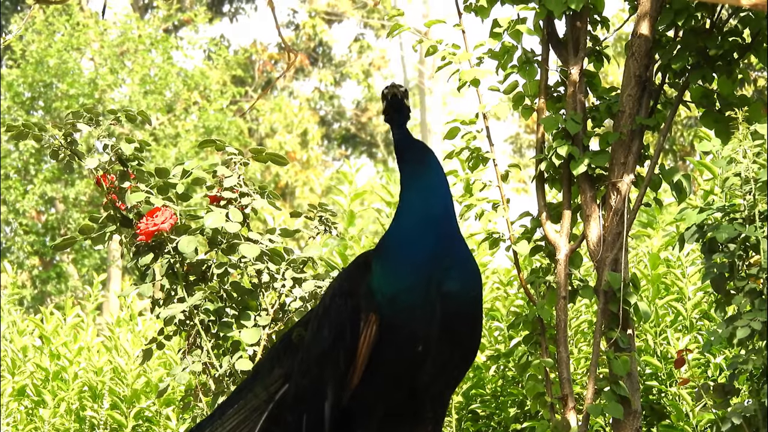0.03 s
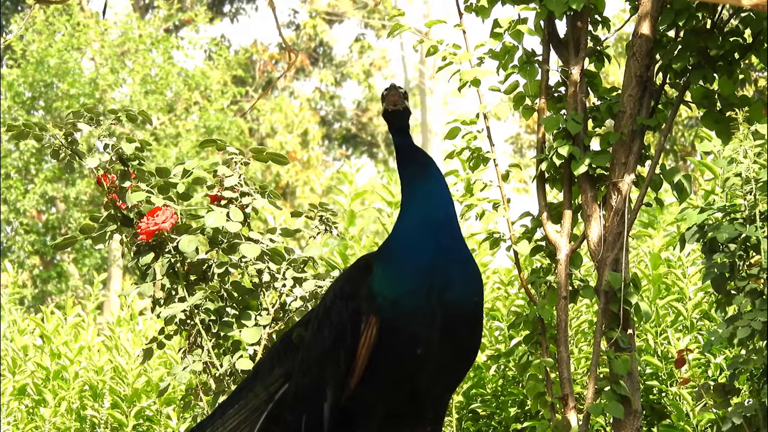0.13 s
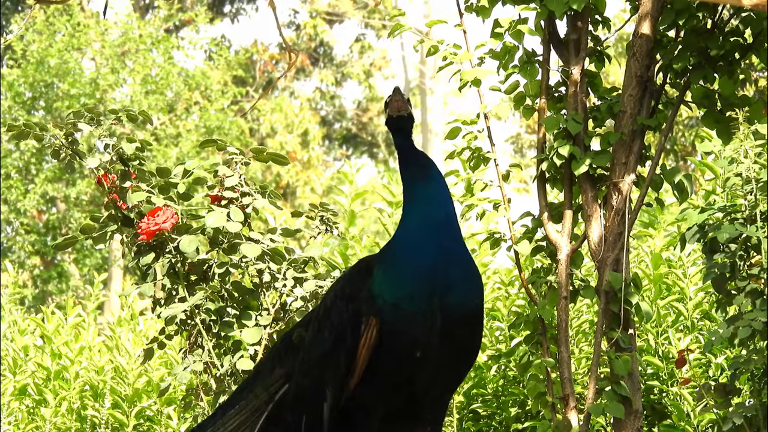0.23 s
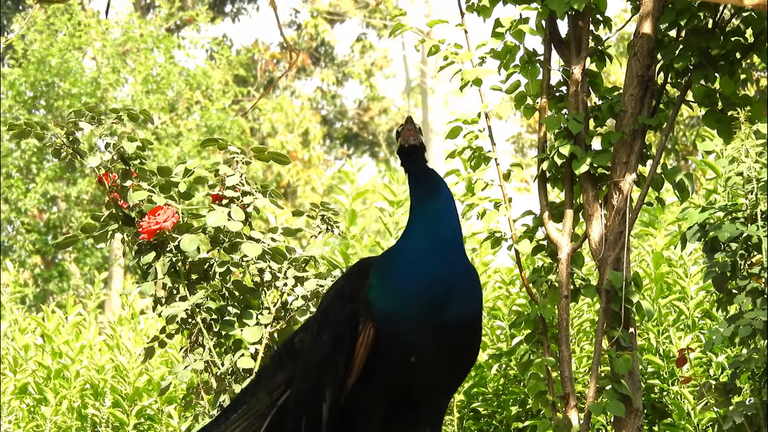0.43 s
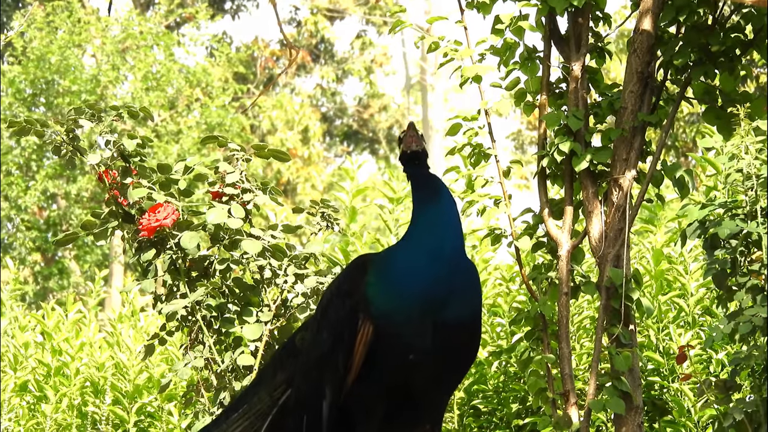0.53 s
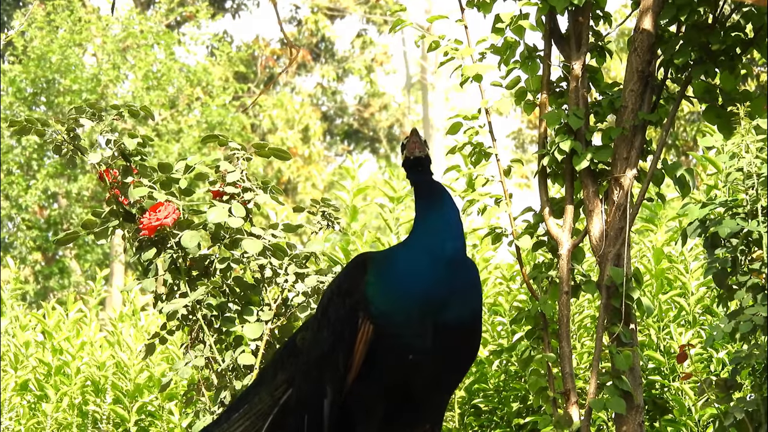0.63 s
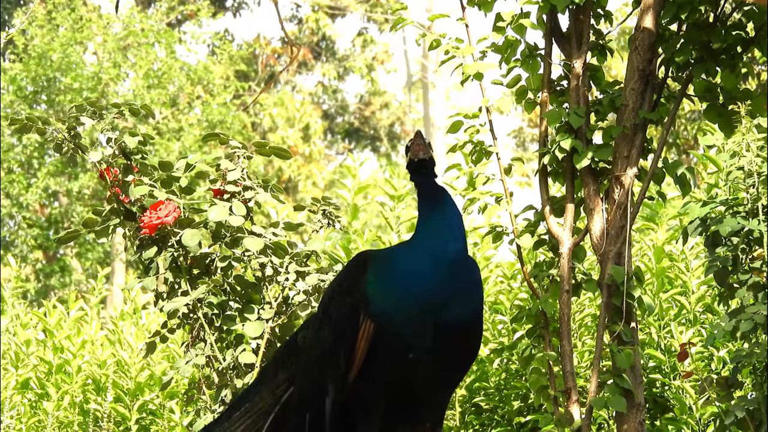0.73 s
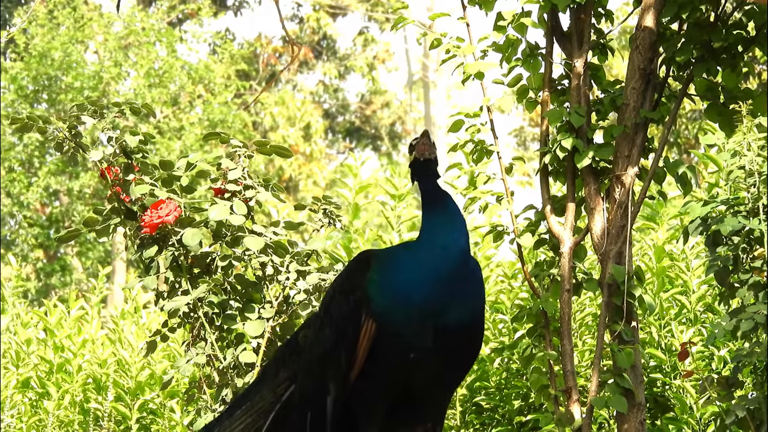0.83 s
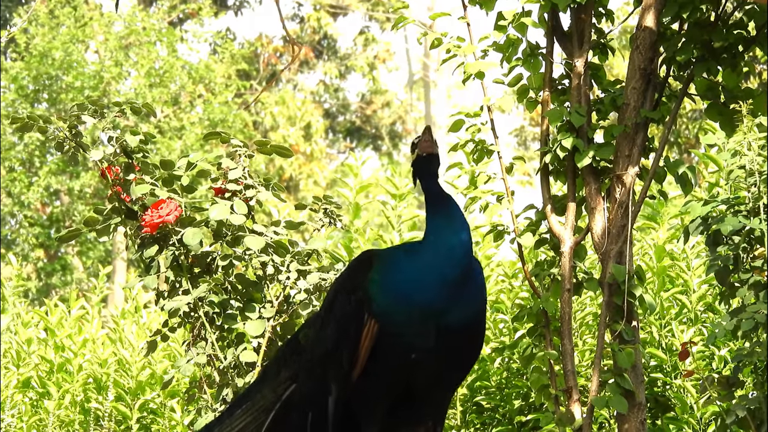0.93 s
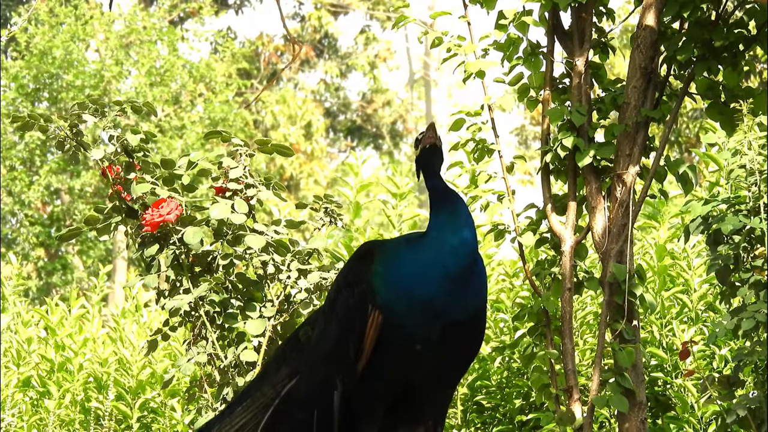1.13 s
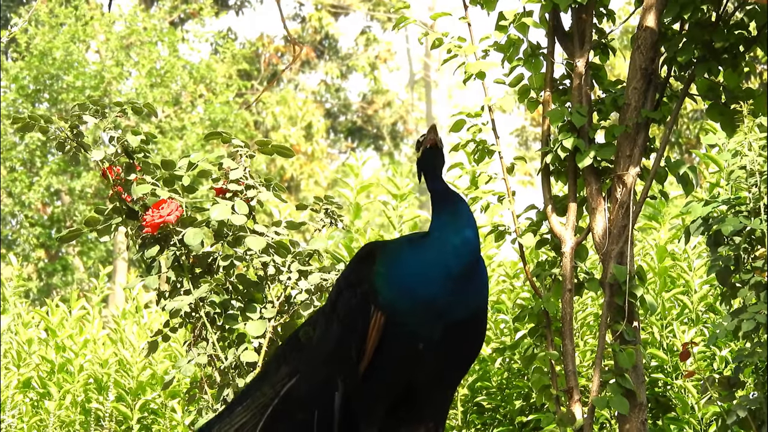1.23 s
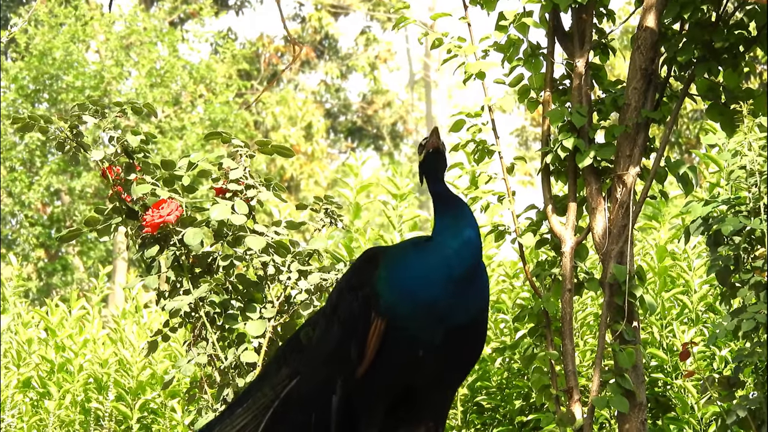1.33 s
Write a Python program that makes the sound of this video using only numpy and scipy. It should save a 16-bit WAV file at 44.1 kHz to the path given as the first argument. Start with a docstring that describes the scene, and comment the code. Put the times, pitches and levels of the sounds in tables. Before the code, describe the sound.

A peacock gives one loud, close wailing call in a quiet garden.

```python
"""A peacock calls once, close by, in a garden, over faint rumbling air, distant birds and a few soft knocks.
At 0.2 s its syrinx catches in five quick stutters; from 0.3 s it holds a low brassy note, shaped by the
throat. At 0.45 s it breaks hoarsely upward into a long clean wail, whose loudest moment just overloads the
microphone. The wail sags and gives out by 1.15 s. Trees scatter the call and return a dull, far echo."""
import sys
import numpy as np
from scipy import signal
from scipy.fft import rfft, irfft
from scipy.io import wavfile

SR = 44100
rng = np.random.default_rng(int(sys.argv[2]) if len(sys.argv) > 2 else 0)


def generate_wav(sig):
    """Save sig (samples, or channels by samples) to the path in sys.argv[1] as 16-bit PCM at SR."""
    pcm = np.round(np.clip(np.atleast_2d(sig).T, -1, 1) * 32767).astype(np.int16)
    wavfile.write(sys.argv[1], SR, pcm)


N = 61739
TIME = np.arange(N) / SR


def syrinx(pitch_hz, roughness):
    """Yields (number, Hz, wave) per harmonic; roughness shakes the cycle and smears the lines."""
    jitter, jitter_hz, rasp_db, rasp_hz = .008, 120, -27, 137   # at roughness 1
    flutter_db, flutter_hz = 1.83, 26.5   # depth at harmonic 8
    dispersion_rad = .7   # the windpipe delays each harmonic differently
    phase = 2 * np.pi * np.cumsum(pitch_hz * (1 + jitter * roughness * drift(jitter_hz))) / SR
    for k in range(1, 25):
        rasp = from_db(rasp_db) * roughness * np.sqrt(k) * (drift(rasp_hz) + 1j * drift(rasp_hz))
        flutter = from_db(flutter_db * min(k / 8, 2) * drift(flutter_hz))
        carrier = np.exp(1j * (k * phase - dispersion_rad * k * k))
        yield k, k * pitch_hz, np.sqrt(2) * flutter * np.real((1 + rasp) * carrier)


def wail(voice):
    """Second syllable: three strong low harmonics; the piercing treble flattens as the throat slackens."""
    # band levels (time [s], level [dB])
    fundamental = [(.445, -61), (.47, -22.5), (.53, -15.5), (.6, -18.5), (.85, -20), (.95, -23.5),
                   (1.04, -28), (1.095, -33), (1.14, -49)]
    octave = [(.441, -52.5), (0.468, -13.5), (.516, -9.5), (0.535, -4), (.56, -7), (.605, -12),
              (0.663, -8.5), (.72, -12.5), (.81, -12), (.9, -10.5), (.939, -6), (.975, -11.5), (1.0, -7),
              (1.031, -19), (1.06, -15), (1.11, -26.5), (1.145, -44)]   # on the main throat resonance
    third = [(.461, -39), (0.5, -18.5), (.555, -14), (.6, -23), (0.663, -20), (.719, -34), (.78, -31),
             (.91, -43), (.96, -34.5), (1.111, -23.5), (1.14, -47)]
    treble = [(.44, -68), (.47, -31.5), (.52, -18.5), (.6, -20), (.66, -22), (.73, -25), (.85, -21),
              (.92, -24.5), (1.0, -30), (1.09, -27.5), (1.117, -34), (1.14, -67)]
    # throat response (frequency [Hz], gain [dB])
    stretched_throat = [(3000, -12), (3130, -6), (3780, -8.5), (3930, -18.5), (4500, -6), (4690, -16.5),
                        (5300, -4.5), (5490, -0.5), (6000, -11.5), (6270, -4.5), (6800, -1), (7060, 2),
                        (7700, -0.5), (7850, -8), (8450, -4.5), (8620, -8.5), (9300, -15.5), (10200, -26),
                        (12000, -27.5), (15500, -43.5)]
    slack_throat = [(2800, 2.5), (3500, 0), (4300, 3), (5200, -0.5), (5900, -11), (6700, -10.5),
                    (7500, -5.5), (8400, -12), (9500, -24), (12000, -29.5), (15500, -35)]
    slacken_span_s = [.81, 1.16]
    slack = np.interp(TIME, slacken_span_s, [0, 1])
    low_gains = [envelope(rows) for rows in (fundamental, octave, third)]
    treble_gain = envelope(treble)
    out = 0
    for k, hz, wave in voice:
        throat_db = (1 - slack) * at_hz(stretched_throat, hz) + slack * at_hz(slack_throat, hz)
        gain = low_gains[k - 1] if k <= len(low_gains) else treble_gain * from_db(throat_db)
        out += gain * wave
    return out


def low_note(voice):
    """Brassy first syllable: a sharp resonance locks on one overtone after another."""
    # loudness (time [s], level [dB])
    level = [(.294, -26.5), (.302, -15), (.311, -10), (.325, -12.5), (.345, -13.5), (.368, -13.5),
             (.39, -15), (.43, -15), (.452, -18.5), (.475, -26), (.49, -57)]
    # throat response (frequency [Hz], gain [dB])
    throat = [(600, -12.5), (1200, -3), (1290, 0), (1850, -2.5), (2450, -15.5), (3100, -17), (3700, -16),
              (4400, -18.5), (5100, -16.5), (5600, -23.5), (6000, -23), (7200, -23.5), (9000, -35),
              (11000, -39.5), (15000, -47)]
    # resonance locks (time [s], centre [Hz], boost [dB], length [s])
    locks = [(0.341, 1865, 4.5, 0.038), (0.353, 3190, 16, 0.028), (0.389, 3680, 10.5, 0.026),
             (0.396, 3030, 9.5, .04), (0.411, 2393, 20, 0.097), (0.453, 1915, 6.5, 0.025)]
    lock_width_hz = 430
    boosts = [(centre_hz, db * np.exp(-(2 * (TIME - time_s) / length_s) ** 4))
              for time_s, centre_hz, db, length_s in locks]
    out = 0
    for _, hz, wave in voice:
        boost_db = sum(db * np.exp(-((hz - centre_hz) / lock_width_hz) ** 2) for centre_hz, db in boosts)
        out += wave * from_db(at_hz(throat, hz) + boost_db)
    return out * envelope(level)


def stutters():
    """The voice catches: rough bell-shaped bursts, each sliding up in pitch."""
    # bursts (time [s], fundamental [dB], overtones [dB])
    bursts = [(0.2102, -30.5, -45), (0.2294, -25.5, -33.5), (0.2495, -25, -10), (0.2688, -22, -7.5),
              (0.287, -24.5, -7.5)]
    # throat response (frequency [Hz], gain [dB])
    throat = [(1200, -6), (1400, 5), (1900, -23), (2600, -33), (3900, -31), (5200, -23.5), (6400, -42),
              (8200, -31), (10000, -51.5), (15000, -55)]
    centre_hz, rise_hz_per_s, width_s = 652.3, 3000, .0042
    time_s, fundamental_db, overtone_db = np.transpose(bursts)
    nearest = np.argmin(abs(TIME - time_s[:, None]), axis=0)
    offset_s = TIME - time_s[nearest]
    pitch_hz = centre_hz + rise_hz_per_s * np.clip(offset_s, -2 * width_s, 2 * width_s)
    out = 0
    for k, hz, wave in syrinx(pitch_hz, roughness=2.1):
        db = fundamental_db[nearest] if k == 1 else overtone_db[nearest] + at_hz(throat, hz)
        out += wave * from_db(db)
    return out * np.exp(-.5 * (offset_s / width_s) ** 2)


def throat_rasps():
    """Throat resonances rasp between the overtones."""
    # resonances (time [s], frequency [Hz], level [dB], length [s], half width [Hz])
    rasps = [(0.37, 3307, -27, .06, 158), (0.502, 7800, -27.5, 0.034, 446)]
    return sum(swell(*rasp) for rasp in rasps)


def hoarseness(pitch_hz):
    """Turbulence in the syrinx, let through once a cycle, where the voice catches, breaks and gives out."""
    # hiss loudness (time [s], level [dB])
    level = [(.2, -62), (.235, -45), (.25, -46), (.29, -33), (.315, -41), (.42, -55), (.45, -36),
             (.485, -32), (.52, -44.5), (.62, -62), (.9, -64), (1.02, -54.5), (1.07, -49), (1.105, -41),
             (1.14, -57)]
    # hiss spectrum (frequency [Hz], relative density [dB])
    spectrum = [(900, -32.5), (1400, -5), (2600, 0), (4000, -6.5), (5200, 1), (6300, -7), (8000, -3.5),
                (10000, -12), (12500, -14), (15500, -24.5)]
    throb = 1 + np.cos(2 * np.pi * np.cumsum(pitch_hz) / SR)
    return envelope(level) * throb * coloured_noise(spectrum, side_db=-11)


def garden(call):
    """Scatter from near foliage, a long faint tail and one dull echo."""
    # reverberation (frequency [Hz], band gain [dB], T60 [s])
    foliage = [(590, -18, 0.32), (1500, -15.5, 0.44), (2080, -7.5, 0.21), (3940, -11.5, 0.31),
               (8100, -12.5, .25), (10500, -13.5, .13), (14000, -13, 0.11)]
    far_tail = [(593, -40.5, 1.8), (1515, -36, 2), (3030, -30, 1.4), (7000, -50, .7), (14000, -54, .4)]
    echo_s, echo_db, echo_cutoff_hz = .5, -55.5, 2240
    dulled = low_pass(call, echo_cutoff_hz, order=4)
    echo = from_db(echo_db) * np.interp(TIME - echo_s, TIME, dulled)
    return reflections(call, foliage, onset_s=.0059) + reflections(call, far_tail, onset_s=.054) + echo


def reflections(x, bands, onset_s):
    """Diffuse reflections build up, then die band by band."""
    # stereo spread (frequency [Hz], side level [dB])
    spread = [(700, -9), (1500, -21.5), (2300, -21.5), (4500, -22), (12000, -18)]
    t60_curve = np.array(bands)[:, ::2]
    edges_hz = np.geomspace(350, 16000, 16)
    response = 0
    for low_hz, high_hz in zip(edges_hz, edges_hz[1:]):
        hz = np.sqrt(low_hz * high_hz)
        build_up = 1 - np.exp(-(TIME / onset_s) ** 2)
        shape = build_up * from_db(-60 * TIME / at_hz(t60_curve, hz))
        band_pass = signal.butter(2, [low_hz, high_hz], "band", fs=SR, output="sos")
        noise = signal.sosfilt(band_pass, stereo_noise(at_hz(spread, hz)))
        response += noise * from_db(at_hz(bands, hz)) * shape / np.sqrt(np.sum(shape ** 2))
    return signal.fftconvolve(x[None], response, axes=1)[:, :N]


def knocks():
    """Soft knocks: short dull puffs of noise, each under an octave wide."""
    # puffs (time [s], level [dB], decay [s], centre [Hz])
    puffs = [(0.157, -33.5, .004, 680), (0.158, -43.5, .012, 195), (.53, -54, .019, 70),
             (.672, -34.5, .0037, 1400)]
    out = 0
    for time_s, db, decay_s, hz in puffs:
        body = signal.butter(3, [hz * .75, hz / .75], "band", fs=SR, output="sos")
        noise = rng.standard_normal(N)
        puff = noise * (TIME > time_s) * np.exp(-abs(TIME - time_s) / decay_s)
        out += from_db(db) * signal.sosfilt(body, puff) / np.std(signal.sosfilt(body, noise))
    return out


def far_birds():
    """Faint notes from other birds, blurred by distance."""
    # notes (time [s], frequency [Hz], level [dB], length [s])
    notes = [(0.078, 3400, -56, 0.025), (0.186, 2450, -53, 0.094), (1.368, 2880, -60, 0.081)]
    return sum(swell(*note, half_width_hz=70) for note in notes)


def air():
    """Low rumble and faint hiss of the outdoors."""
    # air spectrum (frequency [Hz], relative density [dB])
    spectrum = [(25, -13), (65, -7), (110, -6), (200, -3.5), (270, -13), (600, -9), (1200, -18),
                (2600, -19.5), (4500, -26), (9000, -30.5), (11000, -46), (15000, -55)]
    # air loudness (time [s], level [dB])
    level = [(0, -50.5), (.2, -46.5), (.55, -49), (.75, -55), (1.1, -56.5), (1.4, -58)]
    return from_db(in_time(level)) * coloured_noise(spectrum, side_db=-8.5)


def swell(time_s, hz, db, length_s, half_width_hz):
    """Wavering narrow-band tone that rises and fades around time_s."""
    waver = drift(half_width_hz) + 1j * drift(half_width_hz)
    tone = np.real(waver * np.exp(2j * np.pi * hz * TIME))
    return from_db(db) * tone * np.exp(-(2 * (TIME - time_s) / length_s) ** 2)


def coloured_noise(spectrum, side_db):
    """Shaped stereo noise, unit power."""
    colour = from_db(at_hz(spectrum, np.arange(N // 2 + 1) * SR / N))
    return unit_rms(irfft(rfft(stereo_noise(side_db)) * colour, N))


def stereo_noise(side_db):
    """White noise, mostly alike in both channels."""
    mid, side = rng.standard_normal((2, N))
    return mid + from_db(side_db) * side * np.array([[1], [-1]])


def drift(cutoff_hz):
    """Slow random wander, unit RMS."""
    return unit_rms(low_pass(rng.standard_normal(N + SR), cutoff_hz)[SR:])


def envelope(rows):
    """Gain from a dB curve, silent outside it."""
    time_s, db = np.transpose(rows)
    return from_db(np.interp(TIME, time_s, db)) * (TIME > time_s[0]) * (TIME < time_s[-1])


def in_time(rows):
    """Piecewise-linear control curve."""
    return np.interp(TIME, *np.transpose(rows))


def at_hz(rows, hz):
    """Interpolate on a log-frequency axis."""
    rows = np.array(rows)
    return np.interp(np.log(hz + 1e-9), np.log(rows[:, 0]), rows[:, 1])


def low_pass(x, hz, order=2):
    return signal.sosfilt(signal.butter(order, hz, fs=SR, output="sos"), x)


def unit_rms(x):
    return x / np.sqrt(np.mean(x ** 2) + 1e-20)


def from_db(db):
    return 10 ** (np.asarray(db) / 20)


def scene():
    """The peacock straight ahead, the garden around it."""
    # voice pitch (time [s], frequency [Hz])
    pitch = [(.295, 639), (.32, 636.2), (.35, 618), (.385, 602.4), (.425, 605), (.441, 606.2), (.457, 655),
             (.472, 698.6), (.488, 726), (.515, 748.4), (.56, 755.8), (.63, 767.7), (.72, 779.9),
             (.79, 783), (.85, 782.7), (.9, 774.1), (.95, 767), (1.0, 744), (1.05, 722), (1.085, 698.4),
             (1.11, 664.7), (1.14, 599)]
    # voice roughness (time [s], amount [0-1])
    roughness = [(.3, 0.51), (.36, 0.52), (.42, 0.1), (.455, 0.6), (.485, 0.4), (.52, .1), (.75, 0.14),
                 (.92, 0), (1.04, 0.1), (1.12, 0.6)]
    pitch_hz = in_time(pitch)
    voice = list(syrinx(pitch_hz, in_time(roughness)))
    call = stutters() + low_note(voice) + wail(voice) + throat_rasps()
    return call + hoarseness(pitch_hz) + garden(call) + knocks() + far_birds() + air()


def record(dry):
    """Microphone overload rounds the highest peaks; a steep low-pass cuts the top."""
    ceiling, cutoff_hz = 1.1, 15700
    rounded = dry / (1 + (dry / ceiling) ** 16) ** (1 / 16)
    return signal.sosfilt(signal.ellip(10, .1, 70, cutoff_hz, fs=SR, output="sos"), rounded)


dry = scene()
out = record(dry)
generate_wav(out)
```